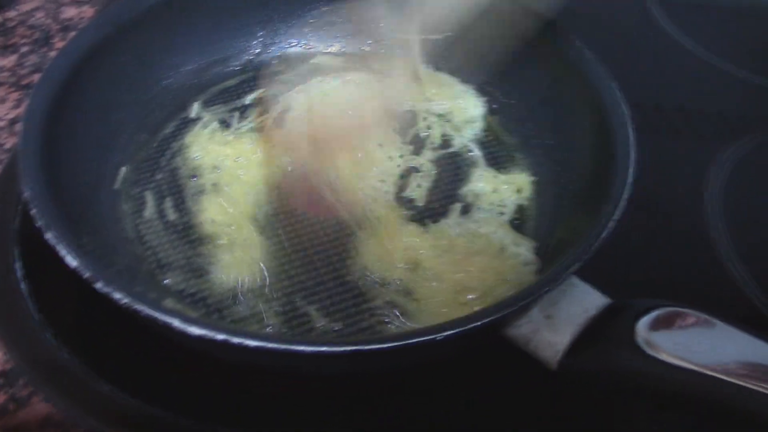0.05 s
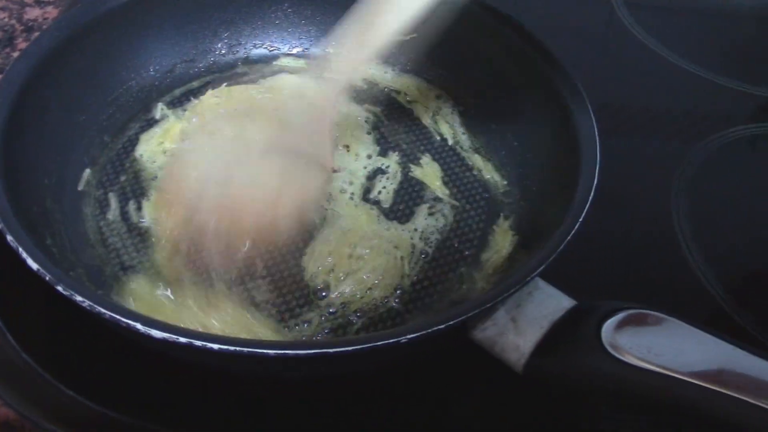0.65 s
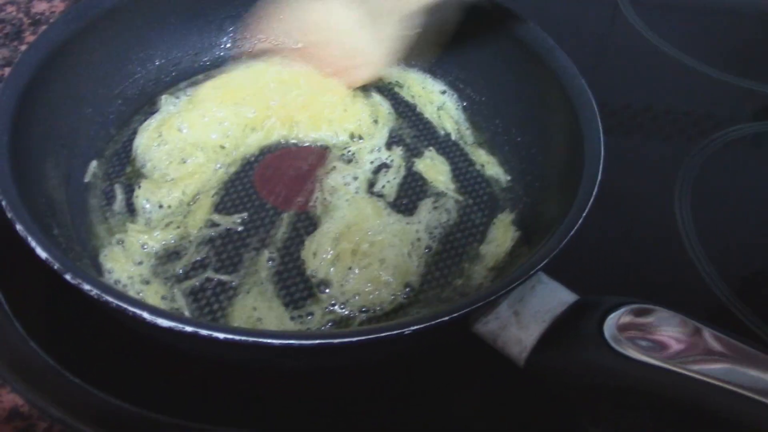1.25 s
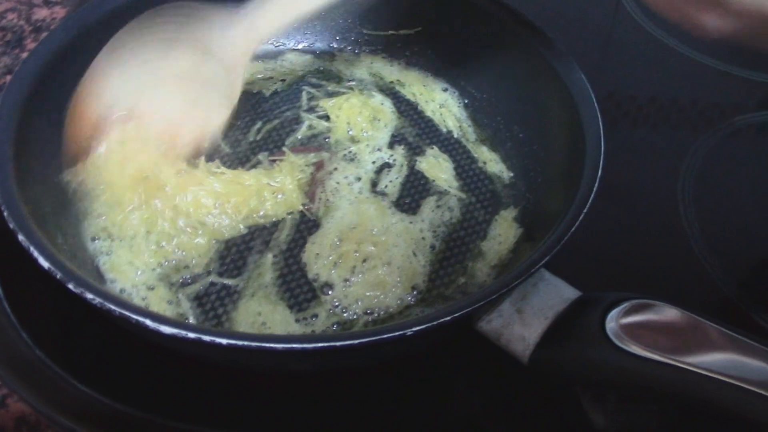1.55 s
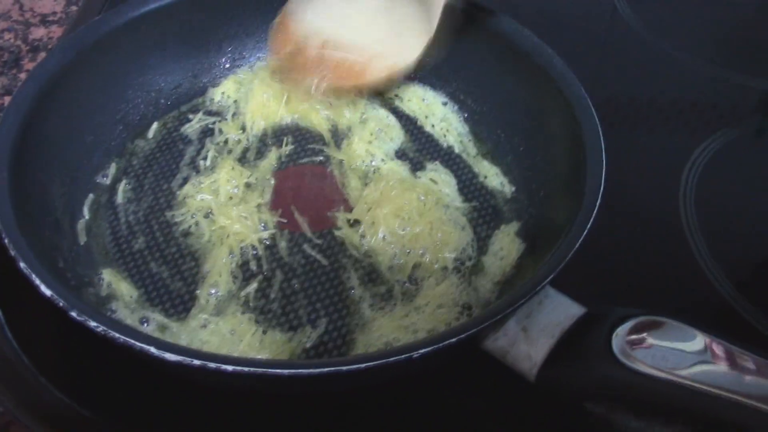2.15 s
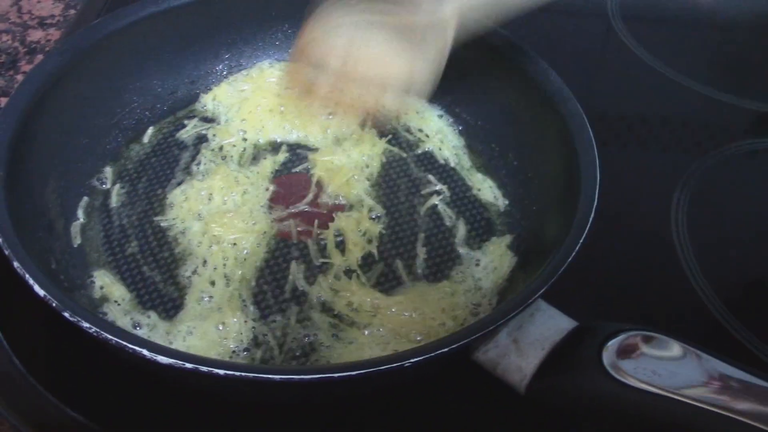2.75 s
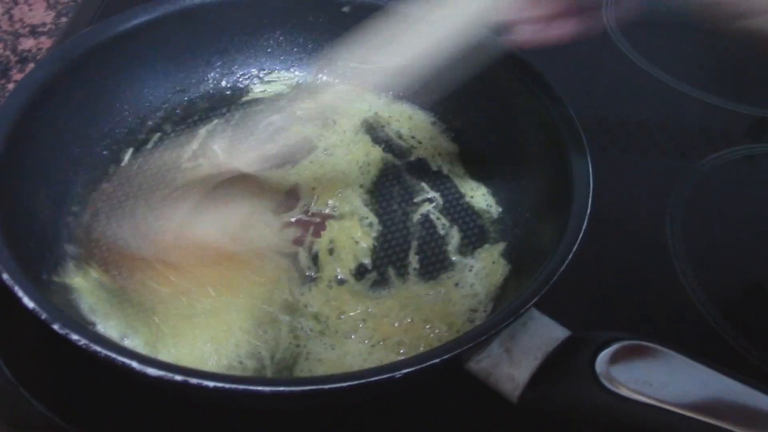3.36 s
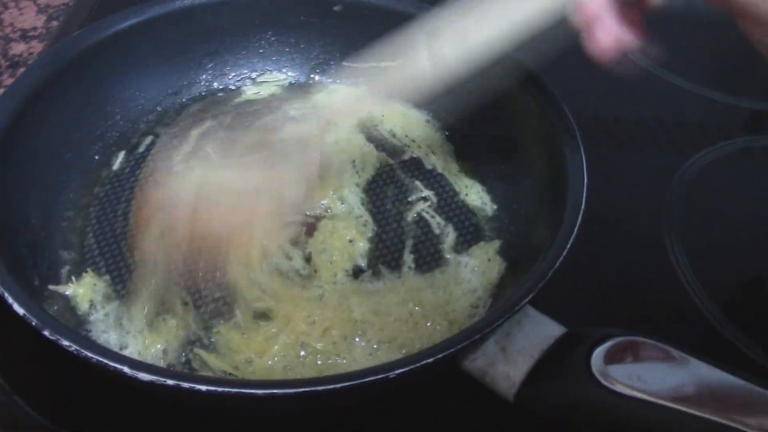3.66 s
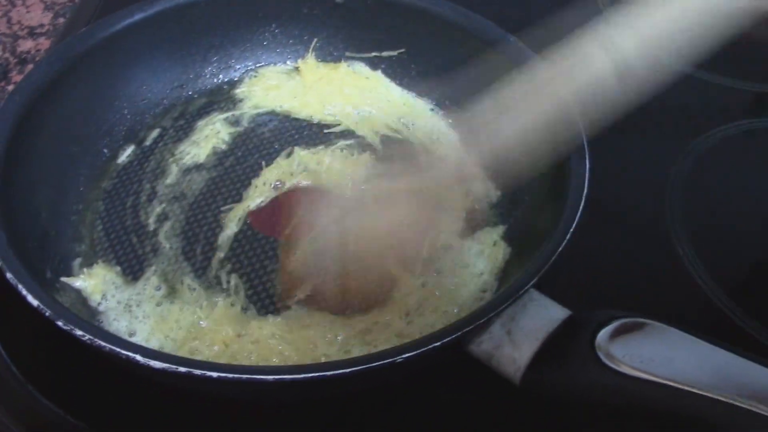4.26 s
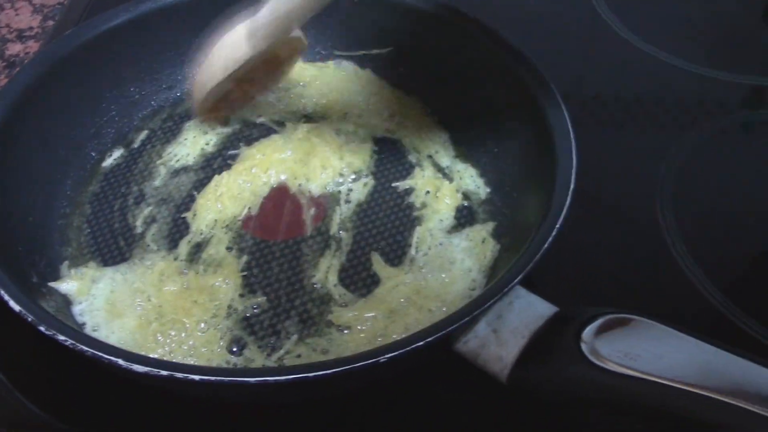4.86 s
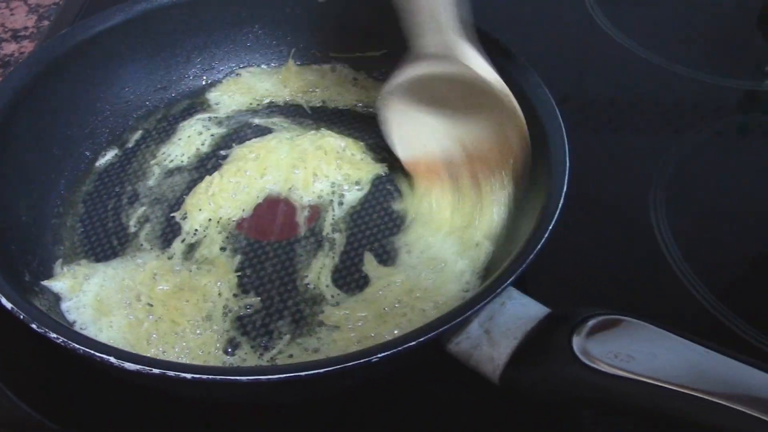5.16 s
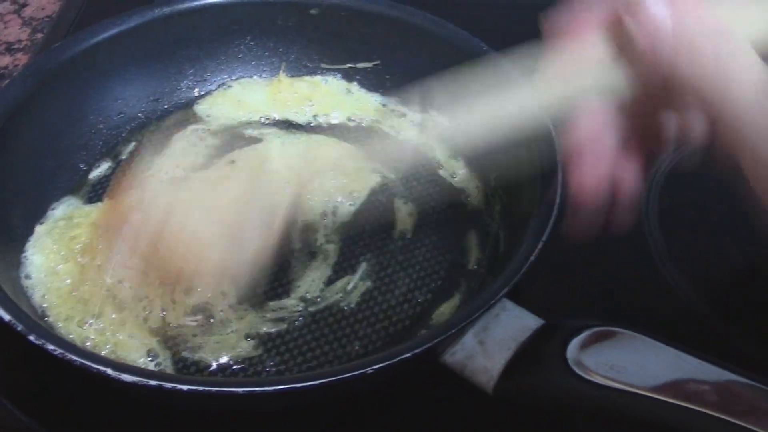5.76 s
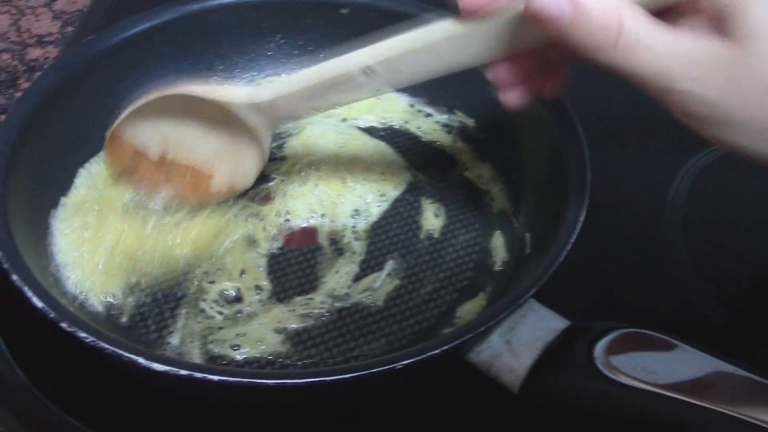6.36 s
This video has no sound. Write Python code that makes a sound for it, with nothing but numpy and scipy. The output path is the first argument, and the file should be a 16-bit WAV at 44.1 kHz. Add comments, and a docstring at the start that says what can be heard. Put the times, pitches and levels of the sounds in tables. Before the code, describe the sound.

Noodles fry in hot fat with a fine, bright fizz and small crackling spits. A wooden spoon stirs throughout, thudding on the base of the pan and now and then rapping its wall with a brief metallic ring. The sizzle swells with each push. Around the middle come a few short scrapes and tiny squeaks. It is heard close up in a small kitchen with a faint low rumble.

```python
"""Noodles frying in a pan

Noodles fry in hot fat in a pan on a glass hob, heard from close by in a small kitchen.
Tiny bubbles fizz and drops of water spit; the frying flares up when wet noodles meet bare metal.
A wooden spoon thuds on the pan's base, raps on its wall, and scrapes and squeaks over its coating."""
import sys
import numpy as np
from scipy import signal
from scipy.fft import rfft, irfft
from scipy.io import wavfile

SR = 44100
rng = np.random.default_rng(int(sys.argv[2]) if len(sys.argv) > 2 else 0)


def digitize_waveform(pressure):
    """Quantize a signal to 16-bit integers and store it at the path in sys.argv[1].

    Rows of a 2-D input are taken as channels; values are limited to [-1, 1].
    """
    field = np.atleast_2d(pressure).T
    bounded = np.clip(field, -1, 1)
    quanta = np.round(bounded * 32767).astype(np.int16)
    wavfile.write(sys.argv[1], SR, quanta)


N = 291942
TIME = np.arange(N) / SR

# Spoon blows: t/s, strength/dB, contact cut-off/Hz (higher is harder), place (0 base .. 1 wall),
# level of the pan's bounce/dB, pitch of the bounce/Hz
BLOWS = [ (0.073, -13.5, 6900, 0.028, -19, 563), (0.0880, -13.5, 1290, 0.063, -21, 333),
         (0.105, -34, 1500, 0.1, -14, 318), (0.528, -33.5, 234, 0.27, -18.5, 206),
         (0.847, -36.5, 256, 0.068, -49, 79), (1.121, -33, 596, 0.72, -25, 159),
         (1.520, -21, 1380, 0.1, -19, 213), (1.543, -37, 800, 0.05, -22, 328),
         (1.872, -28, 427, 0.55, -22.5, 203), (2.219, -19.5, 623, 0.51, -14, 204),
         (2.494, -27.5, 590, 0.4, -28.5, 179), (2.739, -34.5, 250, 0.36, -33, 145),
         (3.1702, -19.5, 3400, 0.86, -20, 199), (3.953, -26.5, 393, 0.9, -19, 195),
         (4.264, -39, 500, 0.4, -29.5, 202), (4.3033, -20.5, 1710, 0.6, -4.5, 813),
         (4.51, -21.5, 332, 0.6, -20, 154), (5.47, -29.5, 465, 0.56, -18.5, 207),
         (5.844, -35, 296, 0.1, -34, 85), (6.127, -34.5, 278, 0.3, -30.5, 157),
         (6.4526, -22, 5340, 0.85, -21.5, 198)]
# The pan's own tones: f/Hz, level struck on the base/dB, level struck on the wall/dB,
# ring time without the spoon resting on it/s. A ring time (t60) is the time to fade by 60 dB.
PAN_TONES = [(169, -9.5, -21, 0.21), (223, -14.5, -6, 0.17), (233.2, -12.5, -6.5, 0.3),
             (324, -1.5, -4, 0.26), (416.6, -3, -7.5, 0.29), (527, 0, -1.5, 0.097), (630, -9.5, -3.5, 0.16),
             (745, 5, -5, 0.044), (767, -2, -17, 0.53), (836, -16, -4, 0.33), (1039, -10, 4, 0.074),
             (1248, -6.5, 5, 0.095), (1376, -10, -2.5, 0.19), (1422, -18, 5.5, 0.28),
             (1610, -0.5, 2, 0.076), (1745, -11, -18, 0.092), (1940, -41, -32, 0.12),
             (2085, -11.5, -13, 0.17), (2440, -4.5, 17, 0.023), (2680, -21, -27, 0.22),
             (2500, -21, 4, 0.044), (3160, -30, -13, 0.076), (3380, 6.5, -20, 0.021),
             (3980, -4.5, -17, 0.078), (5150, -6, -41, 0.098)]


def from_db(db):
    """Turn decibels into a factor to multiply by."""
    return 10 ** (np.asarray(db) / 20)


def rms_one(x):
    """Scale a signal to an average power of 1."""
    return x / np.sqrt(np.mean(x ** 2) + 1e-20)


def at_hz(points, hz):
    """Read between the rows of a (frequency, value) table, giving each octave equal room."""
    f, value = np.transpose(points)
    return np.interp(np.log(np.maximum(hz, 1)), np.log(f), value)


def colour(x, spectrum):
    """Shape x with a (frequency, level) table; beyond its ends the sound falls away steeply."""
    hz = np.arange(len(x) // 2 + 1) * SR / len(x) + 1
    skirts = 1 / np.sqrt((1 + (spectrum[0][0] / hz) ** 6) * (1 + (hz / spectrum[-1][0]) ** 6))
    return irfft(rfft(x) * from_db(at_hz(spectrum, hz)) * skirts, len(x))


def keep_band(x, hz, kind, order=2):
    """Keep what lies below hz ("low"), above it ("high") or between two values ("band")."""
    sections = signal.butter(order, np.clip(hz, 10, .48 * SR), kind, fs=SR, output="sos")
    return signal.sosfilt(sections, x)


def drift(rate_hz):
    """A smooth random wobble, typically 1 away from zero; a higher rate wobbles faster."""
    step, warm_up = 40, 2000  # one value every 40 samples; the first values are thrown away
    r = np.exp(-2 * np.pi * rate_hz * step / SR)
    slow = signal.lfilter([1], [1, -2 * r, r * r], rng.standard_normal(N // step + warm_up + 2))
    slow = rms_one(slow[warm_up:])
    return np.interp(np.arange(N) / step, np.arange(len(slow)), slow)


def ring(tones):
    """A struck object: half a second of fading tones, every second one flipped upside down."""
    t = TIME[:SR // 2]
    return sum((-1) ** k * from_db(db) * np.exp(-np.log(1000) * t / t60) * np.sin(2 * np.pi * hz * t)
               for k, (hz, db, t60) in enumerate(tones))


def add(out, s, sound):
    """Mix a sound into out, starting at s seconds."""
    start = max(round(s * SR), 0)
    out[..., start:start + sound.shape[-1]] += sound[..., :max(N - start, 0)]


def clicks(per_s, spread_db):
    """Random clicks, many small and a few large."""
    sizes = from_db(spread_db * np.minimum(rng.exponential(1, N), 6)) * rng.choice([-1, 1], N)
    return rms_one(sizes * (rng.random(N) < per_s / SR))


def swell(start, length, rise_s, fall_s):
    """The loudness of one push: it grows, holds at 1 and dies away."""
    return np.exp(np.minimum(TIME - start, 0) / rise_s - np.maximum(TIME - start - length, 0) / fall_s)


def rumble():
    """The low, almost steady background of the kitchen."""
    # Tone colour of the rumble: f/Hz, relative level/dB
    spectrum = [(30, -16), (42, -3.5), (58, -12), (80, -6), (125, -9), (200, -13), (310, -9), (450, -17),
                (900, -13.5)]
    level = from_db(-50 + 0.17 * drift(0.87))
    return level * rms_one(colour(rng.standard_normal(N), spectrum))


def kitchen_echo(x):
    """Reflections from all around build up in a few milliseconds; the upper notes die sooner than the low ones,
    though the very top lingers a little longer."""
    # How long the kitchen rings: f/Hz, ring time/s
    ring_times = [(100, 0.42), (500, 0.44), (2000, 0.28), (8000, 0.16), (16000, 0.32)]
    t, tail = TIME[:SR // 2], 0
    for low_hz in 60 * 2. ** np.arange(9):
        octave = keep_band(rng.standard_normal(len(t)), [low_hz, 2 * low_hz], "band")
        tail = tail + octave * np.exp(-np.log(1000) * t / at_hz(ring_times, low_hz * np.sqrt(2)))
    tail = tail * np.clip((t - .002) / 0.0012, 0, 1)
    return signal.fftconvolve(x, tail / np.sqrt(np.sum(tail ** 2)))[:N]


def squeaks():
    """The spoon sticks and slips evenly on the coating for a moment, making a short, wavering tone."""
    # Squeaks: t at the middle/s, half length/s, level/dB, f/Hz
    chatters = [(0.030, 0.033, -40, 1345), (0.032, 0.028, -39.5, 1630), (3.577, .02, -44, 1700),
                (3.61, 0.0091, -26.5, 1720), (4.657, 0.024, -25.5, 1782)]
    out = np.zeros(N)
    waver, roughness = 0.042 * drift(210), from_db(1.1 * drift(280))
    for s, half_s, db, hz in chatters:
        near = np.abs(TIME - s) < 3 * half_s
        tone = np.sqrt(2) * np.sin(2 * np.pi * hz * np.cumsum(1 + waver[near]) / SR)
        fade = np.exp(-((TIME[near] - s) / half_s) ** 2)
        out[near] += from_db(db) * fade * roughness[near] * tone
    return out


def scrapes():
    """Dragged wood catches on the textured coating in many tiny slips, which also set the pan ringing."""
    # Drags of the spoon: t/s, length/s, rasp level/dB, groan level/dB
    drags = [(0.008, 0.022, -43, -38), (3.383, 0.035, -40.5, -68), (3.534, 0.088, -34.5, -45),
             (3.725, 0.018, -35, -45), (4.596, 0.026, -35, -34), (4.663, 0.049, -31, -33.5),
             (6.56, 0.015, -45, -43.5)]
    # Tone colour of the coating's rasp: f/Hz, relative level/dB
    rasp_spectrum = [(700, -6), (1050, 1.5), (1350, 4), (1700, 0), (2200, -4.5), (3000, -5), (5000, -59)]
    # Tone colour of the pan's groan under pressure: f/Hz, relative level/dB
    groan_spectrum = [(150, 1), (300, -5), (430, 10), (600, -3), (850, 0), (1300, -44)]
    slips = clicks(per_s=2800, spread_db=0.5)
    wall_ring = ring([(hz, wall_db, .5 * t60) for hz, _, wall_db, t60 in PAN_TONES])
    rubbing = slips + from_db(-17.5) * rms_one(signal.fftconvolve(slips, wall_ring)[:N])
    rasp = rms_one(colour(rubbing, rasp_spectrum))
    groan = rms_one(colour(rubbing, groan_spectrum))
    out = np.zeros(N)
    for s, length, rasp_db, groan_db in drags:
        grip = swell(s, length, rise_s=0.026, fall_s=0.024)
        out += grip * (from_db(rasp_db) * rasp + from_db(groan_db) * groan)
    return out


def knocks():
    """Noodles under the spoon soften a blow to a thud; bare wood on the wall gives a bright rap."""
    # The spoon's own short tones: f against the wall/Hz, relative level/dB, ring time/s
    spoon_tones = [(610, -24, 0.047), (1040, -9, 0.025), (1710, 2.5, 0.0088), (2260, 7, 0.0038),
                   (3170, -1.5, 0.0065), (4860, -13.5, 0.013), (7400, -8, 0.0069)]
    # Tones of the hob under the pan: f/Hz, relative level/dB, ring time/s
    hob_tones = [(59, 6, 0.12), (78, 5, 0.084), (90.4, -3.5, 0.46), (133, -7, 0.063)]
    soft_contact_hz = 515  # a blow cushioned by noodles
    ring_share, bounce_cycles = 0.42, 10.6
    out = np.zeros(N)
    for s, blow_db, contact_hz, place, bounce_db, bounce_hz in BLOWS:
        hardness = np.log2(contact_hz / soft_contact_hz)
        # the resting spoon leaves the pan only a share of its ring time
        chance_db = 2.35 * rng.standard_normal(len(PAN_TONES))
        pan = [(hz, base_db + place * (wall_db - base_db) + chance, t60 * ring_share)
               for (hz, base_db, wall_db, t60), chance in zip(PAN_TONES, chance_db)]
        add(out, s, from_db(blow_db) * keep_band(ring(pan), contact_hz, "low"))
        # the wood is louder in hard blows and on the wall; noodles on the base lower its pitch
        wood_db = blow_db - 6.5 + 3.5 * hardness + 19 * place
        wood = [(hz * (1 - 0.367 * (1 - place)), db, t60) for hz, db, t60 in spoon_tones]
        add(out, s, from_db(wood_db) * keep_band(ring(wood), contact_hz, "low", order=1))
        # the whole pan bounces for a few cycles
        bounce = ring([(bounce_hz, bounce_db, bounce_cycles / bounce_hz)])
        add(out, s, keep_band(bounce, [0.34 * bounce_hz, 3 * bounce_hz], "band"))
        # slow, soft blows shake the hob most
        hob_db = blow_db - 3 - 4.5 * hardness
        add(out, s, from_db(hob_db) * keep_band(ring(hob_tones), 68, "high"))
    return out


def slaps():
    """A blow squashes wet noodles with a short smack, weaker the nearer it lands to the wall."""
    out, t = np.zeros(N), TIME[:SR // 20]
    for s, blow_db, _, place, _, _ in BLOWS:
        smack = keep_band(rng.standard_normal(len(t)) * np.exp(-t / 0.0014), [710, 9900], "band")
        add(out, s, from_db(blow_db + 7) * (1 - place) * smack)
    return out


def flares(fall_s):
    """How much the frying flares up as the spoon spreads wet noodles onto bare metal."""
    # Pushes of the spoon: t/s, length/s, relative level/dB
    stirs = [(0.01, .02, -36), (0.16, .04, -37), (0.29, 0.032, -40.5), (0.66, 0.028, -38),
             (0.843, .01, -42), (0.91, .07, -38), (1.14, .05, -35), (1.24, .09, -37), (1.55, .01, -40),
             (1.648, .1, -40.5), (1.83, .01, -43.5), (1.988, .03, -38.5), (2.108, .03, -44),
             (2.24, .01, -40), (2.539, .13, -39.5), (2.86, .04, -32.5), (2.988, .02, -40.5),
             (3.308, .09, -35), (3.563, .045, -32.5), (3.729, 0.026, -41), (3.944, .01, -39),
             (4.079, .04, -37.5), (4.261, .08, -41.5), (4.63, .09, -35), (4.78, .05, -40),
             (4.94, .16, -39.5), (5.14, .14, -44), (5.599, .05, -38.5), (5.899, .03, -33.5),
             (6.171, .05, -36), (6.3, .02, -42.5), (6.59, 0.051, -38.5)]
    return np.sqrt(sum((from_db(db) * swell(s, length, rise_s=.022, fall_s=fall_s)) ** 2
                       for s, length, db in stirs))


def fizz_level():
    """The strength of the finest bubbles: flares that linger after each stir, plus steady frying."""
    return np.hypot(from_db(2) * flares(fall_s=0.1), from_db(-40))


def sizzle():
    """Countless tiny bubbles burst in clumps; wet noodles add a lower, smoother hiss that dies sooner."""
    # Tone colour of the fizzing fat: f/Hz, relative level/dB
    fizz_spectrum = [(2500, -33), (4800, -4), (6500, 1.5), (8500, 2), (11000, 0.5), (12800, -4.5),
                     (15500, -6.5), (17000, -57)]
    # Tone colour of the hissing wet noodles: f/Hz, relative level/dB
    hiss_spectrum = [(300, -15), (700, -12.5), (1100, -5.5), (1850, 3.5), (2400, 1.5), (3000, 3), (4200, 2),
                     (5200, -3), (7000, -4), (12000, -50)]
    hiss_level = np.hypot(from_db(4.5) * flares(fall_s=0.053), from_db(-39.5))
    fizz = colour(clicks(per_s=17000, spread_db=3.5), fizz_spectrum) * fizz_level()
    hiss = colour(clicks(per_s=14000, spread_db=3.0), hiss_spectrum) * hiss_level
    clumps = drift(rate_hz=43)
    return fizz * from_db(1.7 * clumps) + hiss * from_db(1.65 * clumps)


def burst(hz, cycles=6.5):
    """A bursting drop: a swing of air pressure that dies within a few cycles, scaled to an energy of 1."""
    t = TIME[:SR // 200]
    swing = np.exp(-np.log(1000) * t * hz / cycles) * np.cos(2 * np.pi * hz * t)
    swing = keep_band(swing, [0.49 * min(hz, 12000), 14500], "band")
    return swing / np.sqrt(np.sum(swing ** 2))


def spits():
    """Water drops burst in the fat, each at its own spot. Gives mid (both ears) and side (left-right)."""
    # The loudest drops: t/s, relative level/dB, f/Hz
    loud_drops = [(0.2907, -10.5, 8700), (0.5798, -16.5, 10400), (0.922, -13.5, 8540),
                  (1.0954, -16.5, 8220), (1.1796, -17, 7320), (1.3314, -8.5, 8700), (1.6043, -20, 11000),
                  (1.6427, -8, 11000), (1.7609, -18, 9900), (1.9934, -10.5, 10500), (2.392, -18, 10200),
                  (2.4372, -15, 5550), (2.7311, -14, 7000), (3.041, -13, 10100), (3.1043, -17, 8360),
                  (3.1486, -15.5, 7500), (3.24, -11.5, 10500), (3.469, -11.5, 11100), (3.646, -15.5, 6700),
                  (4.0073, -17.5, 7400), (4.109, -24, 8500), (4.2651, -13, 11200), (4.354, -14, 10000),
                  (4.3865, -9, 6100), (4.3962, -17, 6360), (4.5838, -13.5, 10700), (4.7562, -12, 9170),
                  (4.778, -12, 9200), (4.8772, -11.5, 9800), (5.1006, -6.5, 7800), (5.3288, -9.5, 9200),
                  (5.8028, -11.5, 6840), (5.8665, -11.5, 10700), (6.0773, -12.5, 9750)]
    out = np.zeros((2, N))
    for (s, db, hz), (spot, wait) in zip(loud_drops, rng.random((len(loud_drops), 2))):
        pop = from_db(db + 8.5) * np.outer([1, 0.56 * (spot - .5)], burst(hz))
        add(out, s, pop)
        # the drop splits, and what is left bursts a moment later
        delay_s = 0.0027 + 0.0071 * wait
        add(out, s + delay_s, from_db(-7.5) * pop)
    # small spits crackle at random, more often while the fat fizzes harder
    boiled_off = np.cumsum(fizz_level())
    for when, size, pitch, spot in rng.random(size=(260, 4)):
        s = np.searchsorted(boiled_off, when * boiled_off[-1]) / SR
        tick = from_db(-20 + 16 * size ** 3.4) * burst(hz=6540 * 2 ** (0.79 * pitch))
        add(out, s, np.outer([1, 0.33 * (spot - .5)], tick))
    # the pan wall and the splashback behind the hob each throw back an echo
    heard = out.copy()
    for lag_s, db in [(.00065, -24), (.0043, -17.5)]:
        add(heard, lag_s, from_db(db) * out)
    return heard


def spray(spit):
    """Each burst throws fine droplets that fizz out over the next few milliseconds."""
    t = TIME[:SR // 20]
    droplets = rng.standard_normal(len(t)) * np.exp(-t / .003)
    return from_db(-11) * signal.fftconvolve(spit, droplets / np.sqrt(np.sum(droplets ** 2)))[:N]


def scene():
    """The pan is straight ahead; only room echo, rumble and spits differ between left and right."""
    spit, spit_side = spits()
    spoon = knocks() + slaps() + squeaks()
    to_room = from_db(-9.5) * spit + from_db(-5.5) * spoon
    mid = sizzle() + spit + spray(spit) + spoon + scrapes() + kitchen_echo(to_room) + rumble()
    side = spit_side + from_db(-17.5) * kitchen_echo(to_room) + from_db(-10) * rumble()
    return np.array([mid + side, mid - side])


def record(dry):
    """The hardest peaks are flattened, the highest treble is cut, and the wave sits slightly off zero."""
    cutoff_hz, offset = 16400, .0117
    clipped = np.clip(dry, -.9, .9)
    treble_cut = signal.ellip(10, .1, 80, cutoff_hz, fs=SR, output="sos")
    return signal.sosfilt(treble_cut, clipped) + offset


dry = scene()
out = record(dry)
digitize_waveform(out)
```